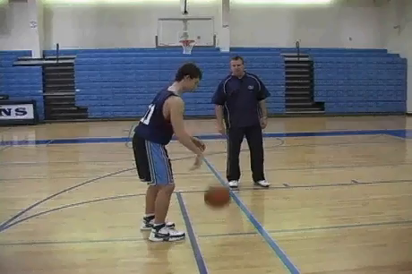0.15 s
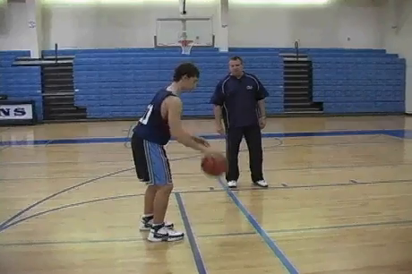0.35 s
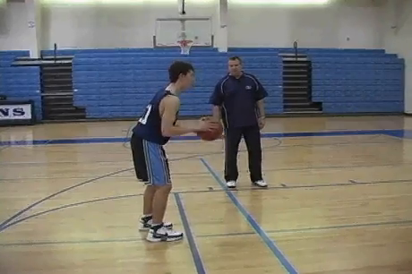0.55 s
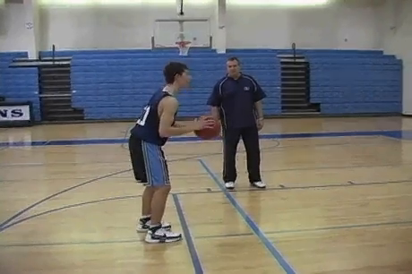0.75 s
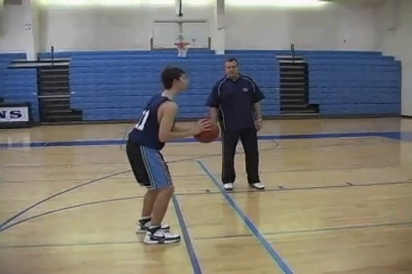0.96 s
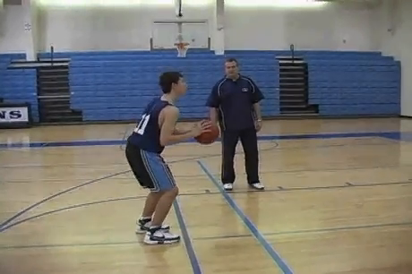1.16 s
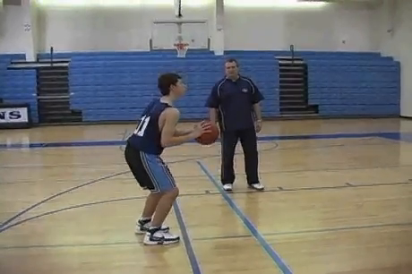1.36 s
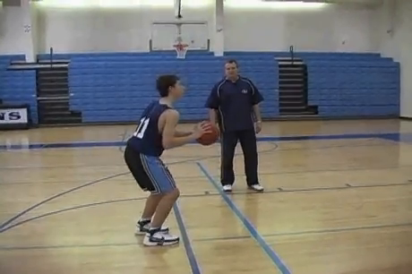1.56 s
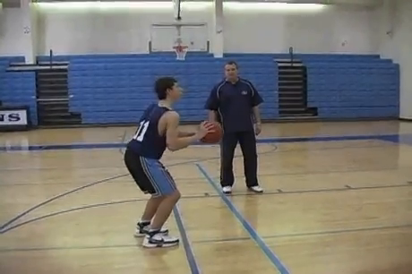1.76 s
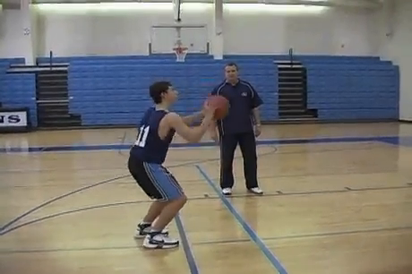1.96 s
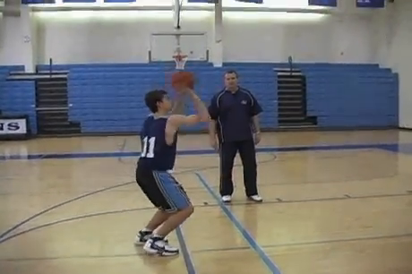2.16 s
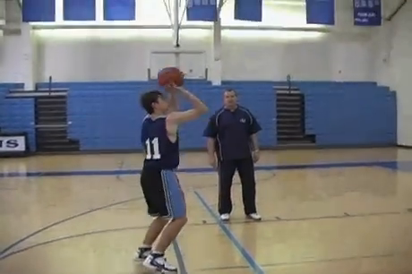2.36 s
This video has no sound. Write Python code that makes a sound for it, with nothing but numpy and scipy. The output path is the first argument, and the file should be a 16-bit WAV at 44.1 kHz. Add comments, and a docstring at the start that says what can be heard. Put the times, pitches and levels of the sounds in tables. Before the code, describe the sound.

One basketball bounce booms on sprung hardwood in a big empty gym, ringing out over faint lamp buzz

```python
"""First a large gym is heard still ringing from an earlier bounce, over buzzing lamps and rumbling ventilation.
Then a hand pats a basketball down and it bounces once on the sprung wooden floor.
The bounce is three noise bursts (rubber slap), fading sine waves (boards and the air in the ball) and a deep
thump of falling pitch. Delayed copies make the wall echoes, and fading bands of noise make the long tail.
Hands and shoes add a few faint taps of noise; the lamps are a stack of sine waves."""
import sys
import numpy as np
from scipy import signal
from scipy.fft import rfft, irfft, next_fast_len
from scipy.io import wavfile

SR = 44100
rng = np.random.default_rng(int(sys.argv[2]) if len(sys.argv) > 2 else 0)


def file_out(sig):
    """Save sig as 16-bit WAV at sys.argv[1]."""
    # one column per channel
    cols = np.atleast_2d(sig).T
    # limit, then scale
    lim = np.clip(cols, -1, 1)
    pcm = np.round(lim * 32767).astype(np.int16)
    wavfile.write(sys.argv[1], SR, pcm)


N = 105840  # samples heard, 2.4 s
LENGTH = next_fast_len(N + SR)  # working length, with room for sounds that start early
T = np.arange(LENGTH) / SR
HZ = np.maximum(np.fft.rfftfreq(LENGTH, 1 / SR), 1)

# In these tables and settings, t60 is the time to fade by 60 dB.
# Colour tables give only the balance between pitches; the loudness is set elsewhere.

# Bounces of the ball, one before the sound begins: start_s, level_db
BOUNCES = [(-0.575, 1), (0.2323, 0)]

# Colour of the hall's tail: pitch_hz, level_db_per_hz
TAIL_COLOUR = [(30, -26), (55, -9), (80, 11.5), (120, 15.5), (170, 3.5), (250, -4.5), (420, -2), (680, -12),
               (850, -9), (1050, -3.5), (1400, -6.5), (2000, -12), (3000, -16), (4500, -18.5), (6500, -23),
               (9000, -23), (12000, -26.5), (16000, -39)]
# How long the hall rings at each pitch: pitch_hz, t60_s
HALL_FADE = [(60, 3.07), (130, 1.86), (400, 1.38), (1100, 2.46), (2500, 3.05), (4500, 2.9), (8000, 1.78),
             (12000, .7), (16000, 0.79)]
# Edges of the bands that fade separately, in Hz
TAIL_BAND_EDGES_HZ = np.concatenate([np.geomspace(15, 4000, 16, endpoint=False), np.linspace(4000, 17000, 20)])
TAIL_DB, TAIL_DELAY_S, TAIL_RISE_S = -29.5, 0.05, 0.021
SCATTER_DB, SCATTER_PER_S, SCATTER_FADE_S = 3, 112, 0.067  # early unevenness of the tail
BASS_EDGE_HZ, BASS_RISE_S = 150, 0.18  # bands starting at or below the edge swell slowly

# Parts of the lamp buzz with a level of their own, each moved to the nearest multiple of BUZZ_HZ:
# pitch_hz, level_db_rms
BUZZ_SET = [(839.8, -68.5), (1200, -72), (1319, -77), (1437, -70), (1798, -78), (2040, -85), (2277, -80),
            (2638, -74.5), (2762, -72), (3838, -78.5), (4317, -79), (4560, -82), (4678, -81.5), (4797, -87),
            (5039, -79), (5518, -80), (5879, -81), (5997, -77.5), (6358, -90), (6481, -76.5), (6718, -106),
            (6837, -79.5), (7079, -91), (8037, -84)]
# Typical level of each remaining part of the buzz: pitch_hz, level_db_rms
BUZZ_REST = [(120, -67.5), (240, -75), (360, -77), (480, -80), (600, -75), (720, -79.5), (960, -98),
             (1100, -90), (1700, -82), (2500, -84.5), (4000, -89), (5000, -85), (5600, -100), (6300, -87),
             (7500, -100), (8200, -93), (10000, -103), (11500, -99), (16000, -110)]
BUZZ_HZ, BUZZ_UNEVEN_DB = 119.97, 3.2  # base pitch, random spread of the remaining parts

# Colour of the ventilation and hiss: pitch_hz, level_db_per_hz
AIR_COLOUR = [(25, -32), (45, -19), (70, -3.5), (105, 1.5), (160, -8), (260, -15), (400, -19), (600, -24.5),
              (900, -23.5), (2000, -30.5), (4000, -31.5), (5600, -34.5), (7000, -34.5), (11000, -39.5),
              (16000, -45)]
AIR_DB = -57.5  # rms

# The hand pushing the ball down, a single row: start_s, peak_db, length_s
HAND_PUSH = (.1243, -30, .0013)

# The ball's skin slaps as it lands, squeaks as it flattens and slaps as it peels off:
# start_s (after contact), level_db, length_s (before fading), treble_db, resonance_hz, boost_db
SLAP_BURSTS = [(.0003, -19, .0039, -1, 1100, 4), (.0082, -24.5, .002, 4, 4300, 10),
               (.0113, -21, .0016, 2, 1300, 2)]
# Colour shared by the bursts: pitch_hz, level_db_per_hz
SLAP_COLOUR = [(60, -2), (200, 18.5), (450, 14.5), (700, -9), (1000, 2.5), (1600, -3), (1950, -12),
               (3200, -15), (4300, -12.5), (5200, -17), (9000, -16.5), (11000, -24), (16000, -29)]
SLAP_T60_S, SLAP_PEAK_OCTAVES = 0.0075, 0.3  # fade, half-width of the resonance
TREBLE_HZ = 2400  # where the treble control starts to act

# Ringing of the boards and of the air in the ball: pitch_hz, level_db, t60_s
RINGING_MODES = [(259, -11, 0.057), (336, -11, .04), (416, -19.5, 0.12), (490, -42, 0.038),
                 (569, -20, 0.051), (744, -38, 0.064), (971, -28.5, 0.16), (1033, -27, 0.027),
                 (1360, -40, 0.022), (1660, -35.5, 0.05), (2190, -41.5, 0.28), (2314, -42, .07),
                 (3760, -60, 0.23), (4300, -44.5, 0.23)]
# Colour of the rattle: pitch_hz, level_db_per_hz
RATTLE_COLOUR = [(60, 2), (180, -1), (300, 4.5), (560, 3.5), (720, -11), (1000, -7.5), (1400, -2),
                 (1900, -18), (3000, -15.5), (4500, -13.5), (9000, -23), (16000, -41)]
RATTLE_DB, RATTLE_T60_S = -26.5, 0.12
RING_ATTACK_S, RING_LAG_S = 0.00085, 0.002

THUMP_START_HZ, THUMP_END_HZ, THUMP_SAG_S = 190, 74, 0.008  # falling pitch
THUMP_DB, THUMP_ATTACK_S, THUMP_HOLD_S, THUMP_T60_S = -5, 0.0012, 0.011, 0.048
THUMP_LAG_S, BOARDS_LOW_HZ = 0.0036, 45.4  # delay after contact, low cut

# Hard surfaces returning the slap: delay_s, level_db
SLAP_ECHOES = [(.0508, -3), (0.0552, -11.5), (0.0607, -24), (0.0772, -8.5), (0.0841, -5.5), (0.1039, -18),
               (0.1133, -16), (.131, -21)]
# Walls, ceiling and bleachers returning the thump: delay_s, level_db
THUMP_ECHOES = [(0.054, -10), (0.079, -19), (0.118, -12.5), (0.144, -21), (0.18, -14.5), (.196, -14),
                (0.249, -24), (0.279, -20.5), (.352, -24.5), (0.511, -28.5), (0.598, -36), (.648, -33.5),
                (0.693, -41.5)]
ECHO_LOW_HZ, ECHO_BRIGHT_DB, ECHO_T60_S = 870, 2, 0.04
BOOM_LOW_HZ, BOOM_HIGH_HZ = 73.6, 154

# Faint taps of hands and shoes: start_s, level_db, pitch_hz, width_hz, t60_s
FAINT_TAPS = [(1.254, -63, 10500, 4000, 0.0086), (1.407, -48, 2970, 1290, 0.024),
              (2.039, -65, 6500, 3000, .015), (2.369, -55.5, 3800, 8000, 0.027)]

CUTOFF_HZ = 15900  # top of the finished sound


def from_db(db):
    """Turn decibels into a gain."""
    return 10 ** (np.asarray(db) / 20)


def rms_one(x):
    """Scale a sound to unit power."""
    return x / np.sqrt(np.mean(x ** 2) + 1e-20)


def at_hz(points, hz):
    """Read a table between its rows, with pitch spaced in octaves."""
    table = np.array(points)
    return np.interp(np.log(hz), np.log(table[:, 0]), table[:, 1])


def fade(t, t60):
    """Fall smoothly by 60 dB every t60 seconds; stay at one until t passes zero."""
    return np.exp(-np.log(1000) * np.maximum(t, 0) / max(t60, 1e-3))


def delayed(x, s):
    """Shift a sound in time; a negative shift drops its beginning."""
    samples = np.arange(LENGTH)
    return np.interp(samples - np.round(s * SR), samples, x, left=0, right=0)


def filtered(x, hz, kind):
    """Keep part of the pitch range with a second-order Butterworth filter."""
    sections = signal.butter(2, hz, kind, fs=SR, output="sos")
    return signal.sosfilt(sections, x + 1e-18)


def noise(colour):
    """Make random noise of the given colour, at rms 1."""
    white = rfft(rng.standard_normal(LENGTH))
    return rms_one(irfft(white * from_db(at_hz(colour, HZ)), LENGTH))


def brighten(x, db):
    """Raise or lower the treble by adding a scaled copy of it."""
    b, a = signal.butter(1, TREBLE_HZ, "high", fs=SR)
    treble = signal.lfilter(b, a, x + 1e-18)
    return x + (from_db(db) - 1) * treble


def tail():
    """Scattered reflections merge into a wash; its bass builds slowly and its highest treble dies first."""
    wash = rfft(noise(TAIL_COLOUR))
    lumps = np.interp(T * SCATTER_PER_S, np.arange(SR // 10), rng.standard_normal(SR // 10))
    unevenness = from_db(SCATTER_DB * np.exp(-T / SCATTER_FADE_S) * lumps)
    scatter = unevenness * (1 - np.exp(-T / TAIL_RISE_S))
    swell = 1 - np.exp(-T / BASS_RISE_S)
    out = 0
    for low, high in zip(TAIL_BAND_EDGES_HZ, TAIL_BAND_EDGES_HZ[1:]):
        band = irfft(wash * ((HZ >= low) & (HZ < high)), LENGTH)
        band = band * fade(T, at_hz(HALL_FADE, np.sqrt(low * high)))
        out = out + band * (scatter if low > BASS_EDGE_HZ else swell)
    return delayed(from_db(TAIL_DB) * out, TAIL_DELAY_S)


def lamps():
    """Lamp ballasts buzz on multiples of twice the mains frequency."""
    partials = BUZZ_HZ * np.arange(1, 131)
    levels = at_hz(BUZZ_REST, partials) + BUZZ_UNEVEN_DB * rng.standard_normal(len(partials))
    for hz, db in BUZZ_SET:
        levels[np.argmin(abs(partials - hz))] = db
    # Draw one cycle, then read it over and over
    turn = np.linspace(0, 1, 4096)
    cycle = 0
    for multiple, db in enumerate(levels, 1):
        peak = np.sqrt(2) * from_db(db)  # a sine's peak is above its rms
        cycle = cycle + peak * np.sin(2 * np.pi * (multiple * turn + rng.random()))
    return np.interp(BUZZ_HZ * T % 1, turn, cycle)


def ventilation():
    """Moving air makes steady noise, mostly a low rumble with a faint hiss."""
    return from_db(AIR_DB) * noise(AIR_COLOUR)


def push():
    """A soft pat of the palm makes one short dip in pressure."""
    s, db, length = HAND_PUSH
    dip = -np.sin(np.pi * np.minimum(T / length, 1)) ** 2
    return delayed(from_db(db) * dip, s)


def slap():
    """Pebbled rubber meets varnished wood in three quick bursts, each with a resonance of its own."""
    out = 0
    for s, db, length, treble_db, peak_hz, peak_db in SLAP_BURSTS:
        envelope = fade(T - length, SLAP_T60_S)
        octaves_away = np.log2(HZ / peak_hz)
        resonance = from_db(peak_db * np.exp(-(octaves_away / SLAP_PEAK_OCTAVES) ** 2))
        coloured = brighten(noise(SLAP_COLOUR), treble_db)
        burst = irfft(rfft(coloured) * resonance, LENGTH) * envelope
        # Give every burst the same energy as its envelope before setting its level
        even_out = np.sqrt(np.sum(envelope ** 2) / np.sum(burst ** 2))
        out = out + delayed(from_db(db) * burst * even_out, s)
    return out


def ring():
    """Ball and boards are set ringing as the floor gives way, with a short rattle."""
    modes = 0
    for hz, db, t60 in RINGING_MODES:
        modes = modes - from_db(db) * fade(T, t60) * np.sin(2 * np.pi * hz * T)
    rattle = from_db(RATTLE_DB) * noise(RATTLE_COLOUR) * fade(T, RATTLE_T60_S)
    attack = 1 - np.exp(-T / RING_ATTACK_S)
    return delayed((modes + rattle) * attack, RING_LAG_S)


def thump():
    """The floor makes a few deep swings, falling in pitch as they fade."""
    pitch = THUMP_END_HZ + (THUMP_START_HZ - THUMP_END_HZ) * np.exp(-T / THUMP_SAG_S)
    envelope = (1 - np.exp(-T / THUMP_ATTACK_S)) * fade(T - THUMP_HOLD_S, THUMP_T60_S)
    swings = -envelope * np.sin(2 * np.pi * np.cumsum(pitch) / SR)
    return filtered(delayed(from_db(THUMP_DB) * swings, THUMP_LAG_S), BOARDS_LOW_HZ, "high")


def echoes(crack, thud):
    """Hard surfaces return the front of the slap; large ones return the thump as a boom."""
    bright = brighten(filtered(crack, ECHO_LOW_HZ, "high"), ECHO_BRIGHT_DB) * fade(T, ECHO_T60_S)
    boom = filtered(thud, [BOOM_LOW_HZ, BOOM_HIGH_HZ], "band")
    slap_echoes = sum(from_db(db) * delayed(bright, s) for s, db in SLAP_ECHOES)
    thump_echoes = sum(from_db(db) * delayed(boom, s) for s, db in THUMP_ECHOES)
    return slap_echoes + thump_echoes


def bounce():
    """Ball and floor sound together, and the hall answers."""
    crack = slap()
    thud = thump()
    return crack + thud + ring() + echoes(crack, thud) + tail()


def taps():
    """Hands and shoes make short damped touches, each with one broad resonance."""
    out = 0
    for s, db, hz, width_hz, t60 in FAINT_TAPS:
        resonance = 1 / (1 + (2 * (HZ - hz) / width_hz) ** 2)
        touch = irfft(rfft(rng.standard_normal(LENGTH)) * resonance, LENGTH)
        out = out + delayed(from_db(db) * rms_one(touch) * fade(T, t60), s)
    return out


def scene():
    """Lay the bounces, the pat and the taps over the steady sound of the gym."""
    dribble = sum(from_db(db) * delayed(bounce(), s) for s, db in BOUNCES)
    steady = lamps() + ventilation()
    return (dribble + push() + taps() + steady)[None, :N]


def record(dry):
    """Cut the very top steeply with an elliptic low-pass filter."""
    sections = signal.ellip(10, 0.1, 80, CUTOFF_HZ, fs=SR, output="sos")
    return signal.sosfilt(sections, dry)


dry = scene()
out = record(dry)
file_out(out)
```